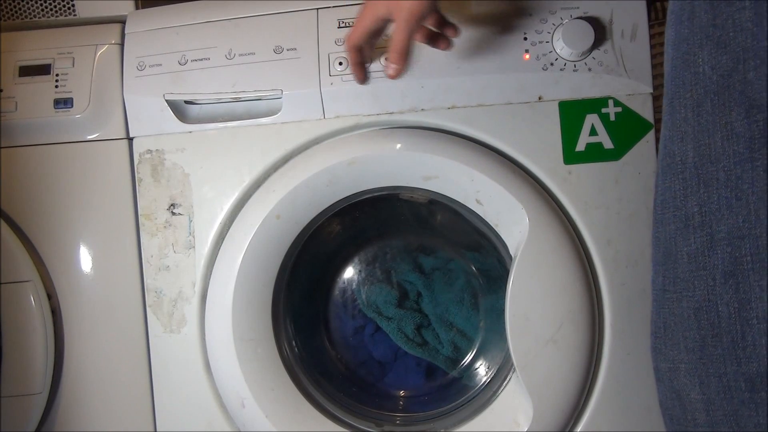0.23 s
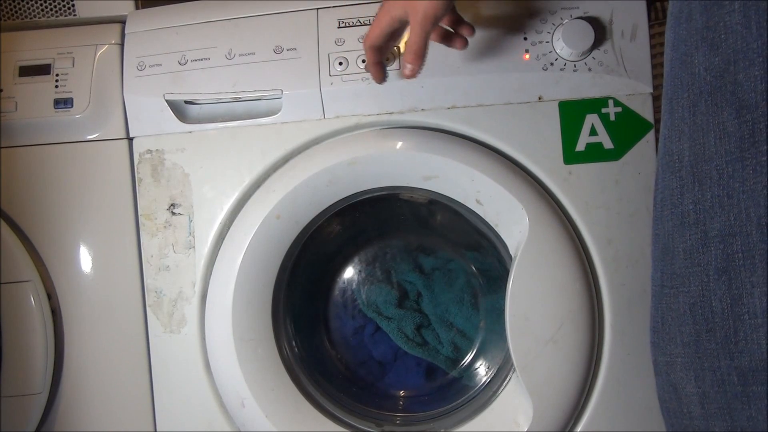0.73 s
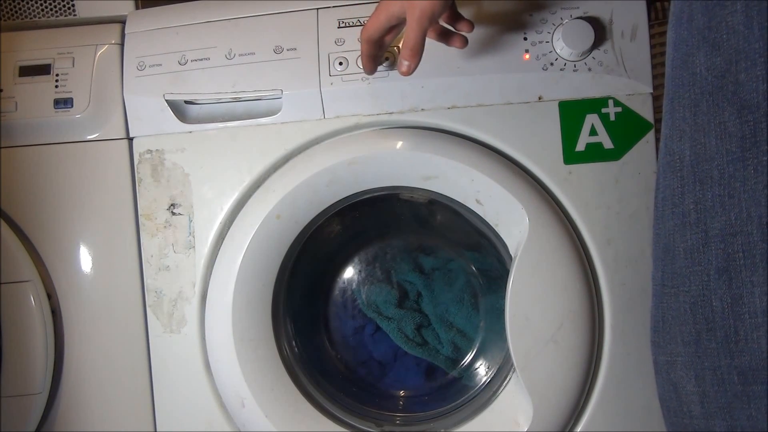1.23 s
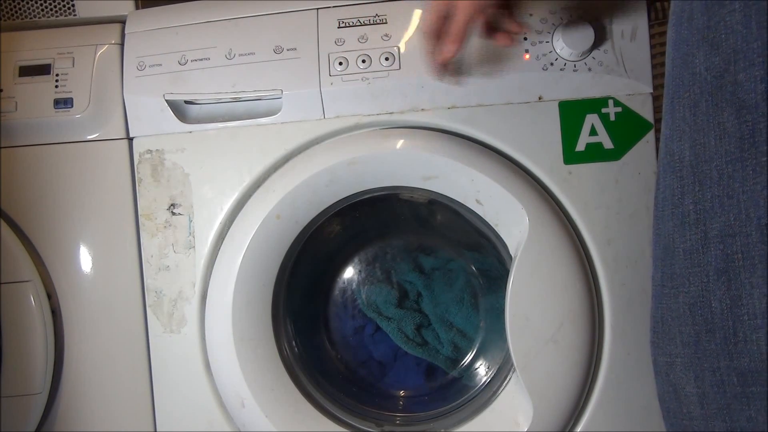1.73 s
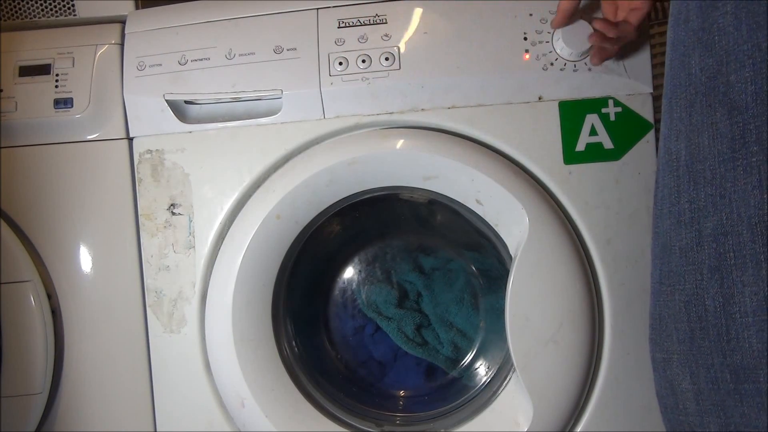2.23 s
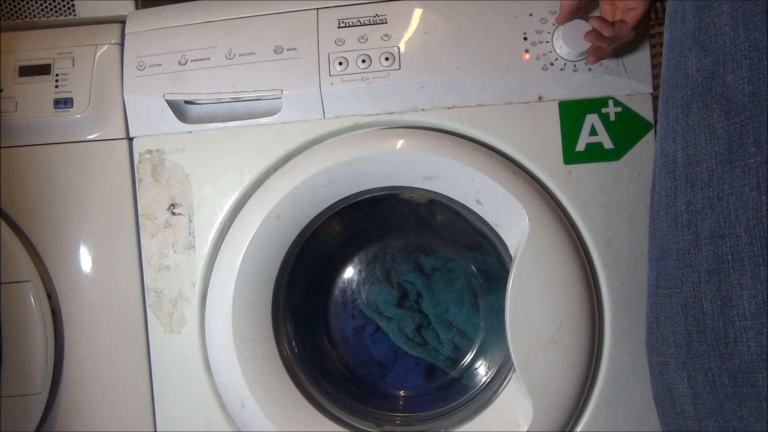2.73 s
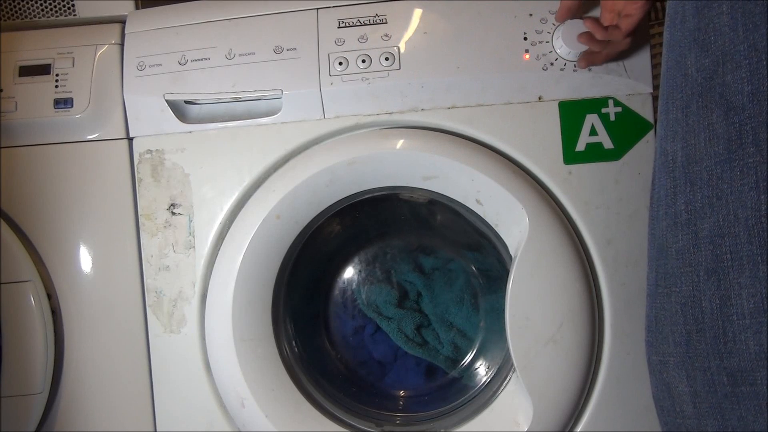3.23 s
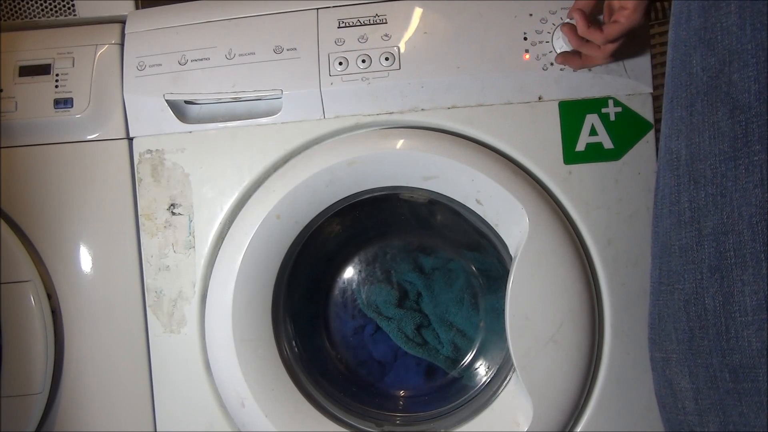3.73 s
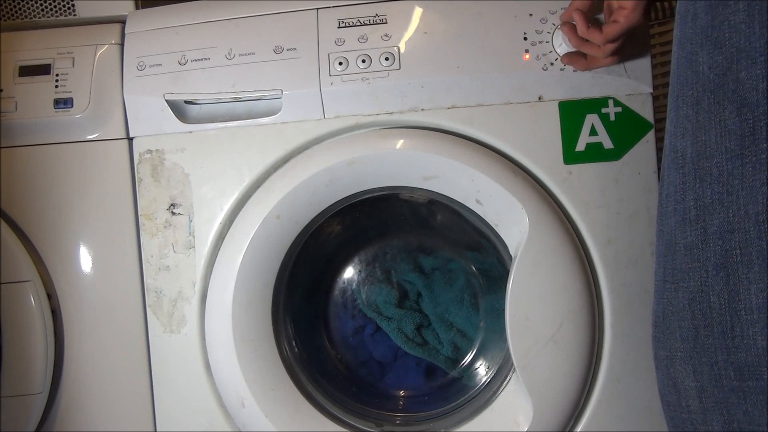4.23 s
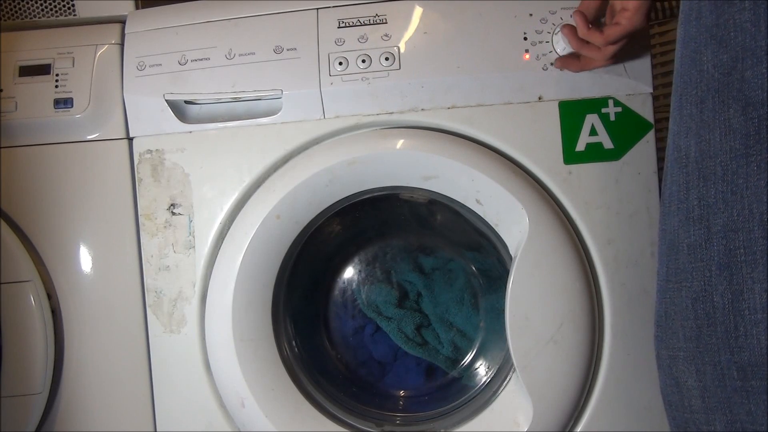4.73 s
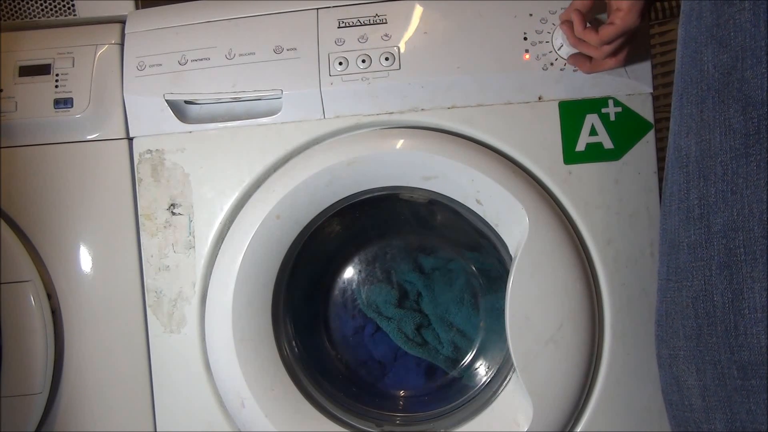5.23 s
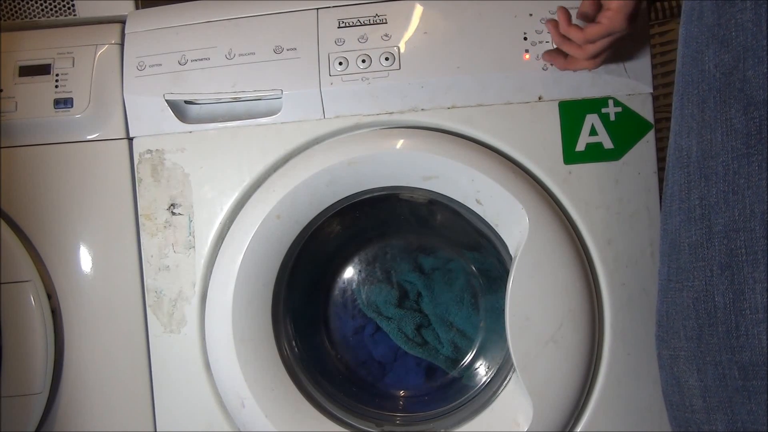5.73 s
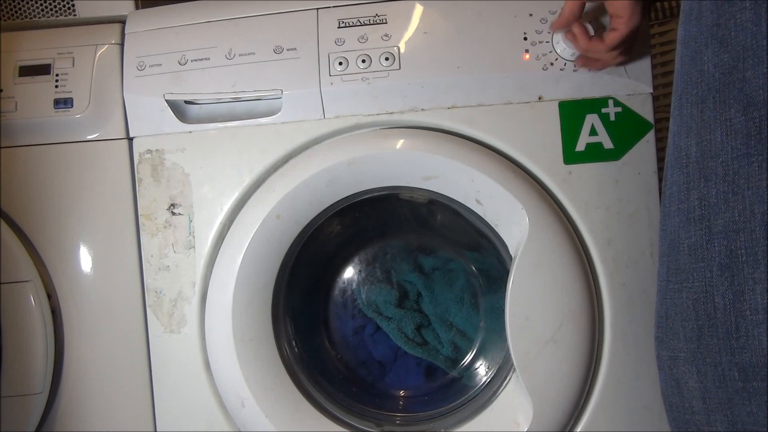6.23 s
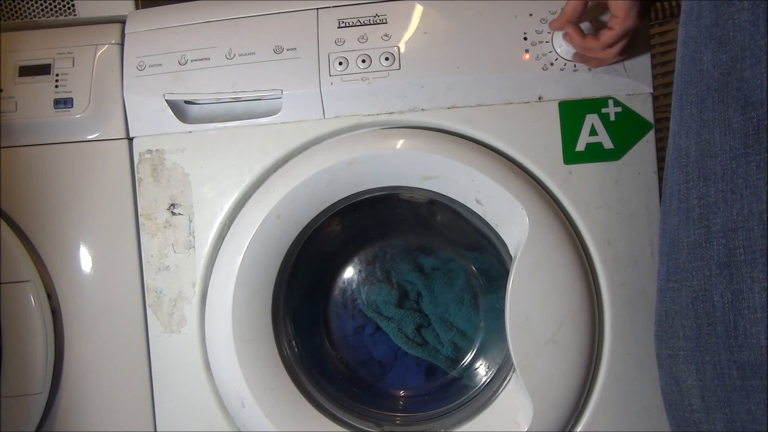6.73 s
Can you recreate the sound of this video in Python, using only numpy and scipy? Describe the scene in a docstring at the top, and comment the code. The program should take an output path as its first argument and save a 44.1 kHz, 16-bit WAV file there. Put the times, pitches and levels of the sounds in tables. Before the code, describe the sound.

In a small room, close stereo microphones pick up steady soft hiss and very faint electronic ticking. Fingers tap faintly on a washing machine's plastic front, a button releases with a tiny bright tick, and a sleeve swishes. The hand lands on the knob with a hollow clack. After a quiet pause, the knob snaps through firm, irregular notches, with dull scrapes and loose plastic rattles between them.

```python
"""Turning a washing machine knob

A finger presses a button on an idle washing machine, then a hand grips the programme knob and turns it.
Each snap into a notch rings the plastic front and steel cabinet: fading tones, noise and a small room's tail.
Sliding fingers, a sleeve and the knob's cam are clumpy filtered noise; the shaft's thunks are three short tones.
Shaped noise makes the steady hiss and low rumble; sine waves make a faint electronic whine and ticking."""
import sys
import numpy as np
from scipy import signal
from scipy.fft import rfft, irfft
from scipy.io import wavfile

SR = 44100
rng = np.random.default_rng(int(sys.argv[2]) if len(sys.argv) > 2 else 0)


def wav_out(sig):
    """Save sig, one row per channel (or a flat mono array), as 16-bit PCM at SR to the path in sys.argv[1]."""
    wavfile.write(sys.argv[1], SR, np.round(np.clip(np.atleast_2d(sig).T, -1, 1) * 32767).astype(np.int16))


N = 308700  # 7 seconds of samples

# Edges of the eight pitch bands that share out a blow, in Hz.
BAND_EDGES_HZ = [135, 250, 415, 830, 1700, 2680, 3100, 4400, 16000]
# Tones of front panel, knob and cabinet. Each row: pitch in Hz, relative level in dB, time to fall 60 dB in s.
PANEL_TONES = [(156.5, -7, 0.17), (191.7, -10, 0.21), (303, 3, 0.16), (347.4, -2, 0.21),
               (374.4, -3.5, 0.28), (456, 0, 0.11), (512, -10, 0.22), (576, -5.5, 0.2), (734.3, 5, 0.075),
               (910.6, 1, 0.11), (1055, -4.5, 0.13), (1135, -1.5, 0.13), (1244, -3.5, 0.12),
               (1428, -6.5, 0.11), (1550, -32, .13), (2003, -5, 0.091), (2120, -12, 0.11),
               (2190, -30, 0.13), (2820, -9, 0.15), (2880, -3, 0.12), (2962, -3.5, 0.077),
               (3373, -15.5, 0.039), (3600, -16, 0.084), (3770, -16, 0.034), (6370, -6, 0.085),
               (7900, -29, .06)]
# How each band answers a blow, from thud, thump, knock, clack, rap and knob ring to click and tick.
# Each row: rise in s, first fall by 60 dB in s, room's fall by 60 dB in s, room noise in dB against the first
# noise, tones in dB against all the noise, gain in dB.
BAND_ANSWERS = [(0.014, 0.12, 0.59, -13.5, 7, -12.5), (0.0012, 0.078, 0.62, -18.5, 3, -5),
                (0.00061, 0.17, 0.36, -8.5, 4, -3), (0.00065, 0.13, 0.26, -3.5, 1, -7),
                (0.00083, 0.027, 0.18, -5.5, -2.5, -10.5), (0.00038, 0.063, .16, -34, 17, -11.5),
                (0.00048, 0.04, 0.24, -14, 4, -17.5), (0.00022, 0.037, 0.15, -9.5, -16.5, -3.5)]
# Tone colour of the sliding cam's murmur. Each row: frequency in Hz, gain in dB.
MURMUR_COLOUR = [(40, -38), (100, -13), (160, -1.5), (430, 5), (620, -3.5), (750, 2), (1300, -19.5),
                 (2200, -17.5), (3000, -26), (4200, -25), (9000, -48)]
# Tone colour of the hiss where things rub. Each row: frequency in Hz, gain in dB.
RUB_HISS_COLOUR = [(1000, 0), (2800, -2), (5000, -10.5), (9500, -3), (12000, -5), (16000, -11)]
# Tone colour of the steady hiss. Each row: frequency in Hz, gain in dB.
HISS_COLOUR = [(15, -52), (25, -19), (190, 0), (229, -5.5), (309, 1), (476, -6.5), (516, 0), (677, -5),
               (1190, -3.5), (1290, -7.5), (1440, -8), (1890, -16), (5000, -20.5), (11900, -19),
               (16000, -23)]
# Humps and dips in the steady hiss. Each row: centre in Hz, width in Hz, height in dB.
HISS_HUMPS = [(806, 9.8, 10), (1179, 28, 7.5), (1358, 58, -13.5), (1416, 45, 10.5), (2513, 160, 8.5),
              (5030, 540, -5), (10350, 350, 4.5), (12400, 400, 2)]
# Thin electronic whine. Each row: pitch in Hz, rms level in dB.
WHINE_TONES = [(7800, -79), (7827, -80), (9001, -82), (9798, -80), (11951, -79), (11999, -82), (13248, -76)]
# How far the steady hiss leans left. Each row: frequency in Hz, left minus right in dB.
HISS_BALANCE = [(90, 2.5), (170, -2), (450, -2.2), (750, -3), (900, -5), (1200, -4.5), (1900, -.7),
                (16000, 0)]
# How far the machine leans left. Each row: frequency in Hz, left minus right in dB.
MACHINE_BALANCE = [(50, 1.5), (140, 4.5), (180, 2.5), (280, -4.2), (770, -3), (1200, -1.5), (2300, .3),
                   (4200, 0), (8300, -1), (13000, 0)]
# How well the plastic front sends out sound. Each row: frequency in Hz, gain in dB.
PANEL_RADIATION = [(70, 8), (150, 0), (1400, 2), (1700, -2), (2900, -2.5), (3900, 6.5), (4800, 0),
                   (6300, 4), (11000, 3), (13500, -1), (16000, -12)]
# How hard the hand leans on the machine, heard as deep rumble. Each row: time in seconds, level in dB.
RUMBLE_LEVEL = [(0, -70), (0.3, -88), (3.5, -86), (4, -71.5), (4.8, -69.5), (5.4, -71), (5.85, -72),
                (5.97, -64), (6.12, -70.5), (7, -71)]
# Sound that reaches the two microphones differently. Each row: frequency in Hz, gain in dB.
SIDE_SPREAD = [(150, -14), (350, -22), (1500, -20), (4800, -25), (7300, -12), (9500, -15), (12000, -25)]
# The button's light spring letting go: start in seconds, level in dB, time to fall 60 dB in s.
BUTTON_RELEASE = (1.284, -26.5, 0.015)
# Blow levels below are those before the panel's band gains and radiation; tick and ring are against the blow.
# The cam climbs a notch and snaps in. Each row: snap time in seconds, level in dB, hardness in dB per octave,
# contact tick in dB, knob ring in dB, shaft thunk in dB against the snap, climb in s.
NOTCH_SNAPS = [(3.9907, -27.5, -.5, -16, -8, -12, .008), (4.0058, -33, 2.4, -10, 5, -8, .004),
               (4.3846, -31.5, 1.8, -12.5, 6, -7, .022), (4.604, -35, .2, -31, 2.5, -5, .03),
               (4.9785, -26.5, -1.3, -21, 2, 1, .045), (5.244, -28, 0, -11, -2, -8, .033),
               (5.9195, -26.5, 0.5, -7.5, -6, -10, .015), (6.5084, -29, 3, -6.5, 4.5, -4, 0.017),
               (6.641, -27, -2, -20, -4, 0, 0.017)]
# The knob knocks about in its loose fit; the soft one at 5.177 s is a finger pushing instead. Each row: start
# in seconds, level in dB, hardness in dB per octave, contact tick in dB.
LOOSE_KNOCKS = [(4.567, -45.5, -.5, -25), (4.737, -47.5, -0.5, -18), (5.177, -45, -9.5, -24),
                (5.556, -43, -2, -25), (5.937, -25.5, -2, -9), (5.9695, -29, 3, -6.5),
                (5.9778, -28, 1.2, -25), (6.055, -42.5, .5, -24), (6.166, -47.5, -6, -18),
                (6.541, -25, -0.2, -18), (6.657, -35, 0, -13.5), (6.739, -37.5, -2.5, -18),
                (6.795, -43, 0.5, -25), (6.975, -46.5, 0, -20)]
# A finger pushes a button or the front, or lets go. Each row: start in seconds, level in dB,
# hardness in dB per octave, contact tick in dB.
FINGER_PUSHES = [(.002, -42, -.8, -23), (.085, -49, -5, -19), (1.2829, -43, 5, -2.5), (1.301, -52, -4, -19),
                 (1.493, -54.5, -1.5, -18), (2.718, -52, -7, -26)]
# A fingertip shoves the whole panel, so it thuds more than the cam does. Each row: frequency in Hz, gain in dB.
PUSH_COLOURING = [(180, 11.5), (320, 3.5), (590, -8), (1200, -1), (3700, 1)]
# Longer rubs: fingers slide on front and knob, a sleeve swishes past, the cam scrapes before its first snap.
# Each row: start in seconds, length in s, murmur in dB, hiss in dB, both before the rub's rise and fall.
LONGER_RUBS = [(0.697, 0.065, -58, -61), (1.61, 0.47, -66, -60.5), (3.864, 0.12, -51.5, -82),
               (4.734, 0.14, -49.5, -82), (5.363, .1, -48.5, -57), (5.503, 0.065, -48.5, -77),
               (5.858, 0.046, -44.5, -55), (5.992, .1, -43, -57.5), (6.233, 0.13, -53.5, -65),
               (6.726, .094, -52.5, -52)]
# The hand lands on the knob and drives it against its shaft: start in seconds, level in dB,
# hardness in dB per octave, contact tick in dB, knob ring in dB, shaft thunk in dB against the blow.
KNOB_GRAB = (2.1425, -24.5, 2.2, -13, -3, 5)
# Strongly damped tones of the knob's shaft. Each row: pitch in Hz, relative level in dB, time to fall 60 dB in s.
SHAFT_TONES = [(440, -4, .07), (570, 0, .09), (655, -3, .06)]

HISS_DB = -54.5  # rms of the steady hiss before it leans left or right
BLIP_ECHO_S, BLIP_ECHO_DB = .0026, -7  # each tiny blip is doubled by a weaker one
FIDGET_DB, FIDGET_SPREAD_DB, FIDGETS_PER_S = 7, 4.5, 20  # restless grip: level is against the deep rumble
# A harder blow lifts the bands above this, except the top one, whose level is the contact tick.
PIVOT_HZ = 594
SOFT_THUD = .16  # share of the hardness slope that also tilts the bass
KNOB_BAND = 5  # which band, counted from 0, holds the knob's ring
DETUNE = .007  # typical share by which each tone's pitch shifts from blow to blow
# The climbing cam: murmur against the snap, hiss against the snap's tick, and sliding on after the snap.
CLIMB_DB, CLIMB_HISS_DB, OVERRUN_S = -13.5, -6.5, 0.021
EDGE_HZ = 15900  # top of the sound's range


def amp(db):
    """Turns decibels into a gain."""
    return 10 ** (np.asarray(db) / 20)


def unit(x):
    """Scales a sound to an rms (average strength) of 1."""
    return x / np.sqrt(np.mean(x ** 2) + 1e-20)


def read(points, hz):
    """Reads between a table's rows, with frequency on a log scale as the ear hears it."""
    f, value = np.transpose(points)
    return np.interp(np.log(hz + 1), np.log(f + 1), value)


def add(mix, s, sound):
    """Mixes a sound in at time s, cut off at the end of the mix."""
    part = mix[max(round(s * SR), 0):][:len(sound)]
    part += sound[:len(part)]


def colour(x, points):
    """Makes each frequency louder or softer by a table of Hz and dB."""
    n = x.shape[-1]
    return irfft(rfft(x) * amp(read(points, np.fft.rfftfreq(n, 1 / SR))), n)


def dying(t, t60):
    """Fades smoothly, falling by 60 dB in t60 seconds."""
    return np.exp(-np.log(1000) * t / t60)


def grains(n, spread_db, per_s):
    """Noise that comes in tiny uneven clumps."""
    noise = rng.standard_normal(n)
    sizes_db = spread_db * rng.standard_normal(n // 10).clip(-2, 2)
    clump_position = np.arange(n) / SR * per_s
    return noise * amp(np.interp(clump_position, np.arange(len(sizes_db)), sizes_db))


def background():
    """Steady hiss: random noise with its tone colour set by a curve, humps and dips."""
    hz = np.fft.rfftfreq(N, 1 / SR)
    humps_db = sum(db / (1 + (2 * (hz - f) / width) ** 2) for f, width, db in HISS_HUMPS)
    shape_db = read(HISS_COLOUR, hz) + humps_db
    noise = irfft(rfft(rng.standard_normal(N)) * amp(shape_db), N)
    return amp(HISS_DB) * unit(noise)


def electronic_whine_and_ticking(tick_hz=3950):
    """Steady sine waves whine, and a tiny blip ticks 25 times a second, strong and weak in turn."""
    t = np.arange(N) / SR
    whine = np.zeros(N)
    for hz, db in WHINE_TONES:
        whine += np.sqrt(2) * amp(db) * np.sin(2 * np.pi * (hz * t + rng.random()))
    beat, within = np.divmod(t + .0239, .04)
    # each blip differs a little in loudness and pitch
    size, drift = rng.standard_normal((N, 2))[beat.astype(int)].T
    blip_db = np.where(beat % 2, -59, -53.5) + .7 * size
    bump = np.exp(-((within - .02) / .0007) ** 2)
    tone = np.sin(2 * np.pi * (tick_hz + 60 * drift) * t)
    blips = amp(blip_db) * bump * tone
    echo = amp(BLIP_ECHO_DB) * np.roll(blips, round(BLIP_ECHO_S * SR))
    return whine + blips + echo


def rumble():
    """The cabinet stirs under the hand as deep noise, and fingers fidget on the plastic as clumpy noise."""
    deep = colour(rng.standard_normal(N), [(10, -4), (35, -18), (80, -0.5), (130, -13), (400, -70)])
    fidget = colour(grains(N, spread_db=FIDGET_SPREAD_DB, per_s=FIDGETS_PER_S), MURMUR_COLOUR)
    level_db = np.interp(np.arange(N) / SR, *np.transpose(RUMBLE_LEVEL))
    return (unit(deep) + amp(FIDGET_DB) * unit(fidget)) * amp(level_db)


def band_centres():
    """Middle of each band in Hz, halfway in musical pitch."""
    return np.sqrt(np.multiply(BAND_EDGES_HZ[:-1], BAND_EDGES_HZ[1:]))


def band_levels(level_db, hardness, tick_db, ring_db=0):
    """Shares a blow among bands: hardness tilts all but the top one, which is the contact tick; the knob rings."""
    octaves = np.log2(band_centres() / PIVOT_HZ)
    db = hardness * np.where(octaves > 0, octaves, SOFT_THUD * octaves)
    db[KNOB_BAND] += ring_db
    db[-1] = tick_db
    return level_db + db


def strikes():
    """Lists every push, grab, snap and knock as its time in seconds and its dB in each band."""
    pushes = [(s, band_levels(*blow) + read(PUSH_COLOURING, band_centres())) for s, *blow in FINGER_PUSHES]
    grab = [(KNOB_GRAB[0], band_levels(*KNOB_GRAB[1:-1]))]
    snaps = [(s, band_levels(*blow)) for s, *blow, thunk_db, climb in NOTCH_SNAPS]
    knocks = [(s, band_levels(*blow)) for s, *blow in LOOSE_KNOCKS]
    return pushes + grab + snaps + knocks


def ringing(tones, t):
    """Fading tones; contact and grip change from blow to blow, so pitches and phases shift each time."""
    hz, db, t60 = np.transpose(tones)[:, :, None]
    hz = hz * (1 + DETUNE * rng.standard_normal(hz.shape))
    waves = np.sin(2 * np.pi * (hz * t + rng.random(hz.shape)))
    return np.sum(amp(db) * dying(t, t60) * waves, axis=0)


def blows():
    """Each blow rings the panel's main tones, a dense cloud of short ones (as noise) and the room."""
    t = np.arange(SR // 2) / SR
    blow_samples = .02 * SR
    bands = [signal.butter(3, edges, "bandpass", fs=SR, output="sos")
             for edges in zip(BAND_EDGES_HZ, BAND_EDGES_HZ[1:])]
    out = np.zeros(N)
    for s, bands_db in strikes():
        ring = ringing(PANEL_TONES, t)
        chatter = grains(len(t), spread_db=4.0, per_s=900)
        room = rng.standard_normal(len(t))
        for band, band_db, answer in zip(bands, bands_db, BAND_ANSWERS):
            rise, first_t60, room_t60, room_db, tones_db, gain_db = answer
            swell = 1 - np.exp(-t / rise)  # the heavy cabinet takes longer to get going
            first_noise = chatter * dying(t, first_t60)
            room_tail = amp(room_db) * room * dying(t, room_t60)
            dense = signal.sosfilt(band, swell * (first_noise + room_tail))
            tones = signal.sosfilt(band, swell * ring)
            sound = unit(dense) + amp(tones_db) * unit(tones)
            # a blow's level is its whole energy, as if spread over 20 ms
            strength = np.sqrt(np.sum(sound ** 2) / blow_samples)
            add(out, s, amp(band_db + gain_db) * sound / strength)
    return colour(out, PANEL_RADIATION)


def climbs():
    """The cam scrapes up to each snap, louder before a louder one; rows are laid out as in LONGER_RUBS."""
    rows = []
    for s, db, _, tick_db, _, _, climb in NOTCH_SNAPS:
        rows.append((s - climb, climb + OVERRUN_S, db + CLIMB_DB, db + tick_db + CLIMB_HISS_DB))
    return rows


def rubs(late=1.28):
    """Tiny uneven slips murmur in the panel and hiss at the contact; each rub builds up, then lets go."""
    out = np.zeros(N)
    slips = grains(N, spread_db=2.5, per_s=370)
    body = unit(colour(slips, MURMUR_COLOUR))
    hiss = unit(colour(slips, RUB_HISS_COLOUR))
    for start, length, body_db, hiss_db in LONGER_RUBS + climbs():
        rub = slice(round(start * SR), round((start + length) * SR))
        sound = amp(body_db) * body[rub] + amp(hiss_db) * hiss[rub]
        # a power above 1 puts the peak past the middle
        swell = np.sin(np.pi * np.linspace(0, 1, len(sound)) ** late)
        add(out, start, sound * swell)
    return out


def button():
    """The button's spring lets go with a very short, very bright tick of fading noise."""
    s, db, t60 = BUTTON_RELEASE
    t = np.arange(SR // 10) / SR
    bright = [(3000, -42), (7000, -25), (9500, 1), (13000, 3), (16000, -4)]
    fizz = unit(colour(rng.standard_normal(len(t)), bright))
    out = np.zeros(N)
    add(out, s, amp(db) * fizz * dying(t, t60))
    return out


def shaft(rise_s=.002):
    """The shaft seats under the grab or a snap with a short, hollow thunk of quickly fading tones."""
    t = np.arange(SR // 5) / SR
    swell = 1 - np.exp(-t / rise_s)
    out = np.zeros(N)
    for s, level_db, _, _, _, thunk_db, *_ in [KNOB_GRAB] + NOTCH_SNAPS:
        add(out, s, amp(level_db + thunk_db) * swell * ringing(SHAFT_TONES, t))
    return out


def microphones(x, balance):
    """Two close microphones: left and right differ by frequency, with a little scattered sound between them."""
    hz = np.fft.rfftfreq(N, 1 / SR)
    t = np.arange(SR // 20) / SR
    scatter = rng.standard_normal(len(t)) * dying(t, .05)
    side = rfft(scatter / np.linalg.norm(scatter), N) * amp(read(SIDE_SPREAD, hz))
    half_db = read(balance, hz) / 2
    left_right = np.array([amp(half_db) + side, amp(-half_db) - side])
    return irfft(rfft(x) * left_right, N)


def scene():
    """Places the machine and the hiss in stereo, with the whine and ticking alike on both sides."""
    hiss = microphones(background(), HISS_BALANCE)
    electronics = electronic_whine_and_ticking()
    machine = rumble() + blows() + rubs() + button() + shaft()
    return hiss + electronics + microphones(machine, MACHINE_BALANCE)


def record(dry):
    """Cuts off the highest treble with a steep low-pass filter."""
    low_pass = signal.firwin(511, EDGE_HZ, window=("kaiser", 9), fs=SR)
    return signal.oaconvolve(dry, low_pass[None], "same")


dry = scene()
out = record(dry)
wav_out(out)
```